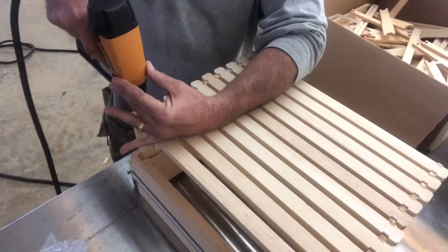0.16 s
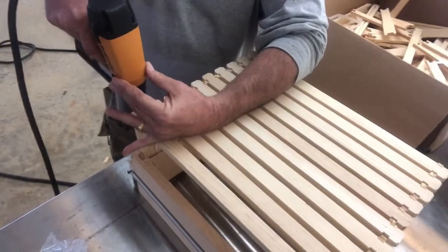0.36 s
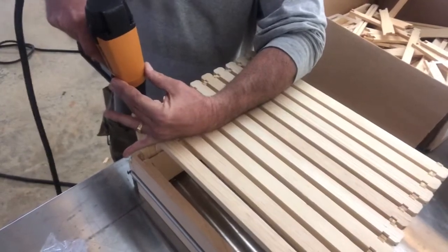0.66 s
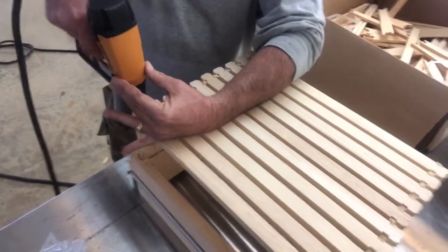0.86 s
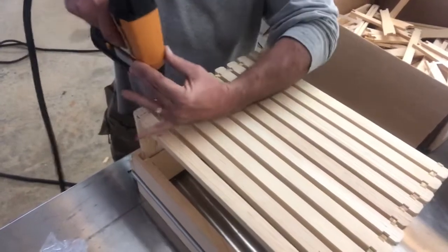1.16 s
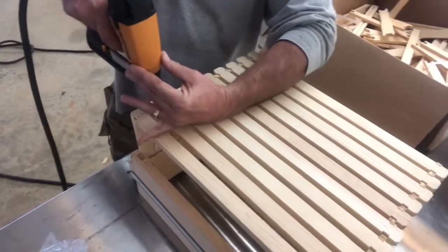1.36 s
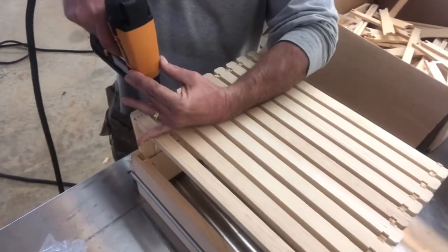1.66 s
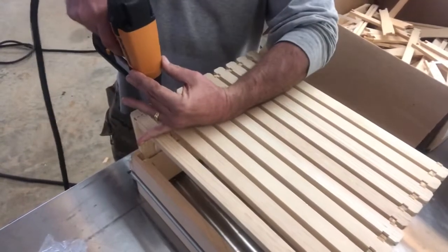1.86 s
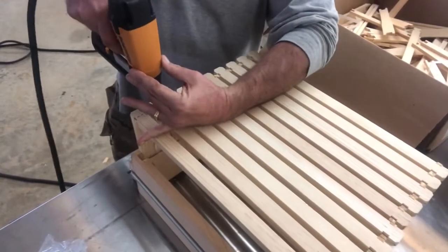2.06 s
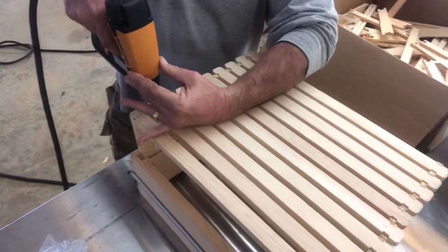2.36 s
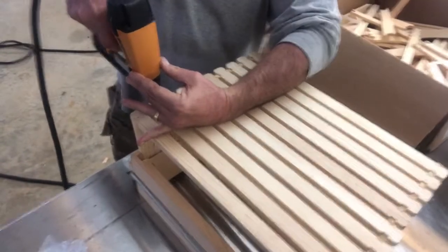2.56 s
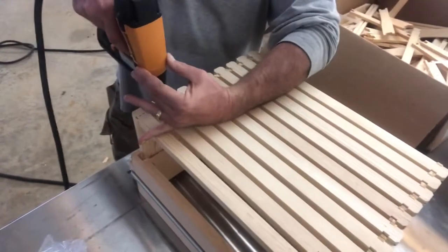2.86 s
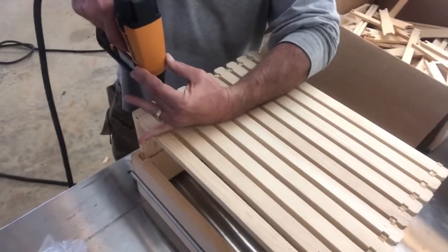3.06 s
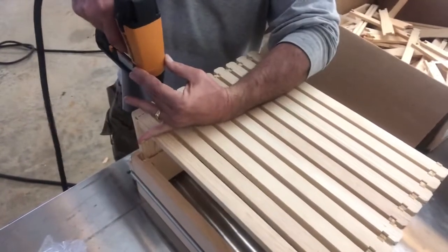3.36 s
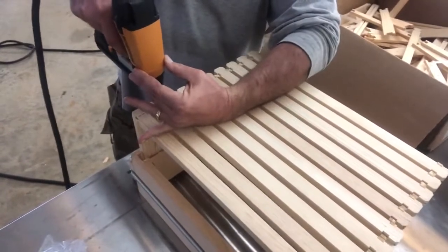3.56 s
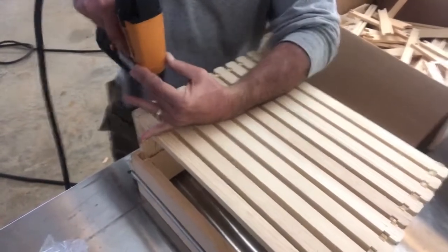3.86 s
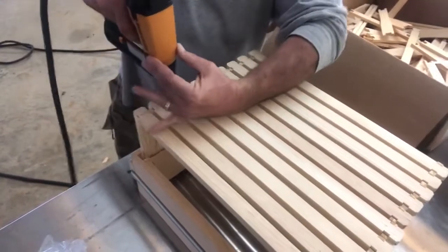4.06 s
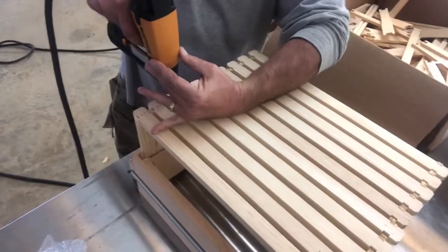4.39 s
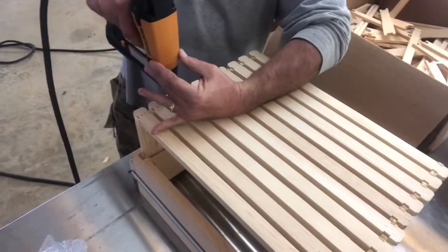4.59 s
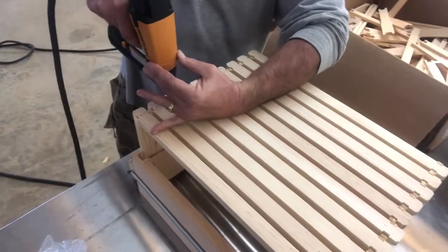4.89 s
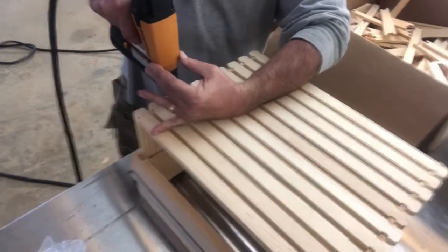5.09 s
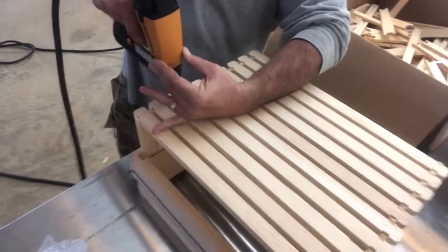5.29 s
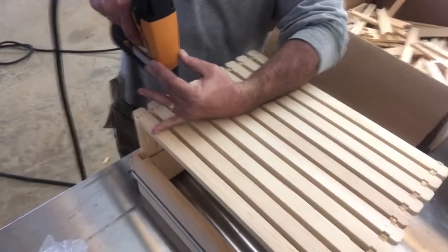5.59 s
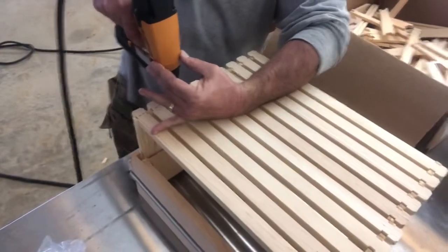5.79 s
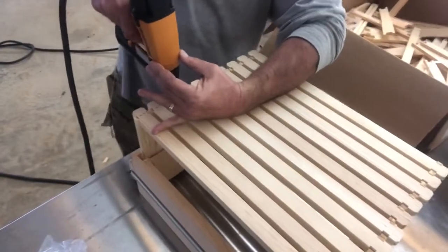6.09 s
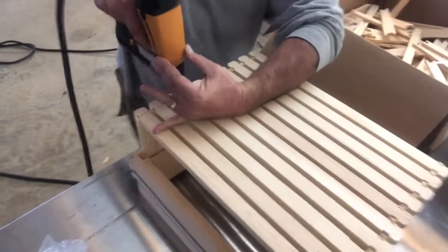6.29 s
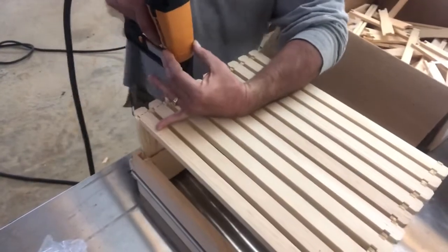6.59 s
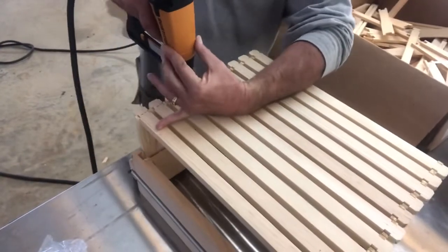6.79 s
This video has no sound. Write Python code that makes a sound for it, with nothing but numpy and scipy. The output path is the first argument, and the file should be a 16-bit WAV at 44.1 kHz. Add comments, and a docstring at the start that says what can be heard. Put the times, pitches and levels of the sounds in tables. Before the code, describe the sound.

A pneumatic stapler fires five sharp, cracking shots into wooden slats, each followed by a clack and air burst, echoing through a hard-walled workshop.

```python
"""Low room noise with a wavering hum, a light tool tick, then a pneumatic stapler drives five staples into a
frame of wooden slats in a large, hard-walled workshop. Each shot: ticks, blade snap, bumper hit, frame thump;
on letting go the valve clacks, air blows off, the piston knocks home. Between: handling, leak whistle, a far puff.
Blows: rough forces ringing resonances. Air: coloured noise shaped by flow. Echo: noise decaying band by band."""
import sys
import numpy as np
from scipy import signal
from scipy.fft import rfft, irfft
from scipy.io import wavfile

SR = 44100
rng = np.random.default_rng(int(sys.argv[2]) if len(sys.argv) > 2 else 0)


def to_wav(s):
    """Save 16-bit WAV."""
    ch = np.atleast_2d(s).T  # columns
    pcm = np.round(np.clip(ch, -1, 1) * 32767)  # PCM
    wavfile.write(sys.argv[1], SR, pcm.astype(np.int16))


N = 306054
TIME = np.arange(N) / SR
SHORT = TIME[:2 ** 14]   # time axis of a single blow

# background noise spectrum: f/Hz, level/dB per Hz
FLOOR_SPECTRUM = [(15, -48), (25, -23.5), (157, -2), (222, -2.5), (276, -7), (325, -3.5), (513, -7.5),
                  (955, -16.5), (1090, -16), (2030, -21.5), (2200, -20), (4500, -18.5), (5400, -29),
                  (8270, -39), (15800, -49)]
# background noise level: t/s, level/dB
FLOOR_LEVEL = [(0, -50.5), (2.4, -48), (3.0, -57.5), (3.6, -53.5), (5.9, -51), (6.94, -48)]
# whistles of a leaking seal: t/s, length/s, f/Hz, level/dB
LEAKS = [(0.195, 0.12, 5600, -72), (0.286, 0.37, 6080, -67), (2.04, 0.14, 5530, -65.5),
         (2.19, 0.24, 5750, -64.5), (3.2, 0.2, 6100, -69)]
# distant air puff, dulled by the way: f/Hz, level/dB per Hz
FAR_PUFF_SPECTRUM = [(100, -7.5), (400, 7), (1000, 10), (2000, 3), (4500, 6), (6000, -4), (9000, -18),
                     (16000, -23.5)]
# tool clicks as it is shifted: t/s, level/dB
SHIFT_TICKS = [(0.015, -70.5), (0.34, -70.5), (1.544, -67.5), (1.576, -63.5), (2.128, -73), (4.657, -73.5)]
# safety nose and trigger ahead of each shot: lead/s, level/dB re blade snap
LEAD_TICKS = [(0.0245, -32), (0.013, -27.5)]
# soft bumps of hand and tool on the frame: t/s, level/dB
BUMPS = [(0.042, -63.5), (0.303, -62), (1.207, -60), (2.27, -65.5), (4.656, -66), (5.684, -63)]
# shots: t/s, blade snap level/dB, recoil force and air charge/dB
SHOTS = [(0.7310, -30, 0), (2.4770, -26.5, -4), (3.6817, -31, -3.5), (4.9737, -33, -5), (6.0315, -35, 0.88)]
# trigger hold of each shot: length/s
TRIGGER_HELD_S = [0.1155, 0.106, 0.0945, 0.103, 0.111]
# resonances of tool ticks: f/Hz, width/Hz, level/dB
TICK_MODES = [(900, 180, 2.5), (2400, 560, -2.5), (3200, 130, 1), (4300, 930, 0.5), (5530, 1800, -4.5),
              (7300, 1100, -8), (10100, 3000, -25.5)]
# resonances of loose slats under the hand: f/Hz, width/Hz, level/dB
SLAT_MODES = [(150, 70, -2.5), (215, 60, -7), (306, 47, -0.5), (969, 220, -16)]
# resonances of the exhaust valve: f/Hz, width/Hz, level/dB
VALVE_MODES = [(800, 220, -26), (1800, 500, -14), (2410, 320, 5.5), (3500, 340, -14), (4460, 590, -2.5),
               (6460, 1800, -15.5)]
# resonances of the piston at its top stop: f/Hz, width/Hz, level/dB
PISTON_HOME_MODES = [(435, 280, -3.5), (700, 180, -17), (912, 92, -3), (1300, 310, 2.5), (2400, 1500, -8.5),
                     (2896, 500, 2), (4400, 800, -3), (6610, 6100, -13)]
# resonances of the blade: f/Hz, width/Hz, level/dB
BLADE_MODES = [(180, 89, -2.5), (736, 390, 5.5), (1354, 330, 4), (1670, 270, 0), (2455, 300, 4.5),
               (3270, 650, 3), (4220, 400, 7), (5230, 300, -0.5), (6100, 1600, -7), (11900, 6000, -26)]
# resonances of the piston on its bumper: f/Hz, width/Hz, level/dB
BUMPER_MODES = [(139.6, 150, -8.5), (420, 130, -6.5), (1280, 570, -5.5), (2300, 700, -20),
                (3740, 1400, -6.5), (4667, 360, 4.5), (5320, 770, -2.5), (7200, 3700, -13.5),
                (12500, 6000, -23.5)]
# resonances of the wooden frame on its jig: f/Hz, width/Hz, level/dB
FRAME_MODES = [(59.9, 38, -18), (112, 32, -10.5), (161, 21, 0.5), (178, 47, -9.5), (207.4, 33, -6),
               (245.8, 52, -13), (315, 20, -11), (399.7, 17, -8), (537, 34, -8.5), (760, 170, -16)]
# air jet of inrush and exhaust: f/Hz, level/dB per Hz
AIR_JET_SPECTRUM = [(60, -23), (110, 1.5), (200, -19.5), (700, -20.5), (1300, -3.5), (1800, -19),
                    (2500, -11), (3300, -2), (4400, 2.5), (5600, -2.5), (7500, -5), (9000, -12.5),
                    (12500, -15), (16000, -24)]
# workshop decay: f/Hz, t60/s
ROOM_T60 = [(60, 1.2), (160, 0.48), (320, 1.58), (800, 1.11), (2400, 1.407), (4400, 1.323), (7000, 0.8),
            (10000, 0.72), (15000, 0.56)]
# workshop echo colour: f/Hz, level/dB
ROOM_COLOUR = [(50, -1.5), (170, 0.5), (300, 6), (440, -0.5), (620, 1), (800, -3.5), (1300, -5), (1900, 5),
               (2450, 3), (3000, -1), (4500, -1), (5600, -2.5), (8000, 4.5), (14000, 5)]

LEAK_WAVER_RMS_HZ, LEAK_FLICKER_RMS_DB, LEAK_FADE_S = 99.5, 3.5, 0.03
FAINT_TICKS_PER_S, FAINT_TICK_DB = 2.5, -78
BUMPER_OVER_SNAP_DB = 2.7
FRAME_DB, VALVE_DB, EXHAUST_DB, KNOCK_DB = -31.5, -29.2, -27, -30.5   # at a force of 0 dB
ROOM_FEED_DB = -22     # blade and bumper into the room, at a force of 0 dB
ROOM_FOLLOWS = 0.79    # feed dB per force dB
BUMPER_DELAY_S = 0.0074
PISTON_RETURN_S = 0.039   # valve clack to knock at the top
CUTOFF_HZ = 15900


def from_db(db):
    """Decibels to gain."""
    return 10 ** (np.asarray(db) / 20)


def unit(x):
    """Scale to the energy of one second at rms 1."""
    return x / np.sqrt(np.sum(x ** 2) / SR + 1e-20)


def at_hz(points, hz):
    """Read a table on a log-frequency axis."""
    f, value = np.transpose(points)
    return np.interp(np.log(hz + 1), np.log(f), value)


def add(track, s, sound):
    """Mix a sound into a track at time s."""
    start = max(int(round(s * SR)), 0)
    track[start:start + len(sound)] += sound[:N - start]


def coloured(x, spectrum):
    """Filter a sound by a spectrum table."""
    hz = np.fft.rfftfreq(len(x), 1 / SR)
    return irfft(rfft(x) * from_db(at_hz(spectrum, hz)), len(x))


def noise(spectrum, size):
    """Steady coloured noise, rms 1."""
    x = coloured(rng.standard_normal(size), spectrum)
    return x / x.std()


def swell(rise, hold, fade):
    """Blow envelope: linear rise, exponential decay from time hold; all in s."""
    decay = np.exp(-np.clip((SHORT - hold) / fade, 0, 40))
    return np.minimum(SHORT / rise, 1) * decay


def chatter(envelope):
    """Rough contact force: random in detail, about equally strong at all frequencies."""
    force = rng.standard_normal(len(SHORT)) * envelope
    # alternate between a flat spectrum and the envelope
    for _ in range(4):
        spectrum = rfft(force)
        flat = irfft(spectrum / (np.abs(spectrum) + 1e-12))
        force = flat * np.sqrt(envelope)
    return force


def struck(modes, force):
    """A force rings parallel resonances of alternating sign."""
    out = 0
    for k, (hz, width_hz, db) in enumerate(modes):
        r = np.exp(-np.pi * width_hz / SR)
        poles = [1, -2 * r * np.cos(2 * np.pi * hz / SR), r * r]
        ringing = (1 - r * r) / 2 * signal.lfilter([1, 0, -1], poles, force)
        out = out + (-1) ** k * from_db(db) * ringing
    return unit(out)


def jet(spectrum, flow):
    """Turbulent air that follows the flow through a vent."""
    return unit(coloured(chatter(flow), spectrum) * flow ** (1 / 8))


def background():
    """Ventilation noise with a narrow-band wavering hum; a lower drone joins at the end."""
    air = from_db(np.interp(TIME, *np.transpose(FLOOR_LEVEL))) * noise(FLOOR_SPECTRUM, size=N)
    hum_spectrum = [(270, -60.5), (302, -5.5), (314, -3.5), (328, -12.5), (365, -65.0), (900, -120)]
    hum = from_db(-62) * noise(hum_spectrum, size=N)
    drone_hz = 146
    drone_gate = np.clip((TIME - 6.6) / 0.14, 0, 1)
    drone = from_db(-50) * drone_gate * np.sin(2 * np.pi * drone_hz * TIME)
    return air + hum + drone


def far_puff():
    """A faint puff of air from across the shop, for the room feed only."""
    out = np.zeros(N)
    puff = jet(FAR_PUFF_SPECTRUM, swell(rise=.002, hold=.01, fade=0.035))
    add(out, 1.733, from_db(-56.0) * puff)
    return out


def leak():
    """Thin sine whistle of a leaking seal, unsteady in pitch and strength."""
    out = np.zeros(N)
    waver_hz = LEAK_WAVER_RMS_HZ * noise([(10, -6), (200, -6), (2000, -45)], size=N)
    flicker_db = LEAK_FLICKER_RMS_DB * noise([(10, -2), (40, -2), (300, -60)], size=N)
    for s, length_s, pitch_hz, db in LEAKS:
        gate = np.clip(np.minimum(TIME - s, s + length_s - TIME) / LEAK_FADE_S, 0, 1)
        whistle = np.sin(2 * np.pi * np.cumsum(pitch_hz + waver_hz) / SR)
        out += from_db(db + flicker_db) * gate * whistle
    return out


def tick_times():
    """Tool ticks as (t/s, level/dB): two ahead of each shot, listed shifts, random faint ones."""
    leading = [(s - lead_s, snap_db + db) for s, snap_db, _ in SHOTS for lead_s, db in LEAD_TICKS]
    faint = [(s, FAINT_TICK_DB) for s in TIME[rng.random(N) < FAINT_TICKS_PER_S / SR]]
    return leading + SHIFT_TICKS + faint


def tool_tick():
    """A light contact rings the tool's small parts."""
    return struck(TICK_MODES, chatter(swell(rise=0.00044, hold=0.0027, fade=0.0043)))


def slat_bump():
    """A soft, slow contact rings loose slats."""
    return struck(SLAT_MODES, chatter(swell(rise=0.0037, hold=0.016, fade=0.016)))


def nose_squeak():
    """The nose shifts on the wood: a falling, jittering tone."""
    jitter_hz = 120 * noise([(50, -4.5), (300, 2.0), (2000, -52)], size=len(SHORT))
    falling_hz = 2900 + 1400 * np.exp(-SHORT / 0.016) + jitter_hz
    tone = np.sin(2 * np.pi * np.cumsum(falling_hz) / SR)
    return tone * swell(rise=0.0089, hold=0.03, fade=0.00514)


def handling():
    """Tool ticks, dull bumps on the slats and one short squeak."""
    out = np.zeros(N)
    for s, db in tick_times():
        add(out, s, from_db(db) * tool_tick())
    for s, db in BUMPS:
        add(out, s, from_db(db) * slat_bump())
    add(out, 3.513, from_db(-52.0) * nose_squeak())
    return out


def valve_clack():
    """The valve hits its seat; a rubber seal takes the edge off."""
    soft_seat = signal.butter(2, 7000, fs=SR, output="sos")
    force = chatter(swell(rise=0.00026, hold=0.0021, fade=.0005))
    return struck(VALVE_MODES, signal.sosfilt(soft_seat, force))


def blow_off():
    """Cylinder exhaust: a first spurt at full pressure over a steadier flow until the piston is home."""
    spurt = .5 * swell(rise=0.0032, hold=.014, fade=0.0023)
    steady = swell(rise=0.008, hold=PISTON_RETURN_S - .004, fade=0.0098)
    return jet(AIR_JET_SPECTRUM, steady + spurt)


def piston_knock():
    """The returning piston strikes its top stop."""
    return struck(PISTON_HOME_MODES, chatter(swell(rise=.002, hold=0.0066, fade=0.0075)))


def releases():
    """Valve clack, blow-off and piston knock on letting go; returns direct sound and room feed."""
    direct, feed = np.zeros(N), np.zeros(N)
    for (fired_s, _, force_db), held_s in zip(SHOTS, TRIGGER_HELD_S):
        s = fired_s + held_s
        # delay/s, sound, level/dB, room share/dB
        parts = [(0, valve_clack(), VALVE_DB, -7.5),
                 (.005, blow_off(), EXHAUST_DB, -1.8),
                 (PISTON_RETURN_S, piston_knock(), KNOCK_DB, -2.7)]
        for delay_s, sound, db, share_db in parts:
            add(direct, s + delay_s, from_db(force_db + db) * sound)
            add(feed, s + delay_s, from_db(force_db + db + share_db) * sound)
    return direct, feed


def inrush():
    """Air rushes in above the piston, ever faster."""
    return jet(AIR_JET_SPECTRUM, swell(rise=.006, hold=.006, fade=.001) ** 3)


def blade_snap():
    """The blade shears the staple off with a crack, then pushes it through the wood."""
    crack = swell(rise=.0001, hold=0.00074, fade=0.00036)
    push = swell(rise=0.00029, hold=0.0032, fade=0.0031)
    return struck(BLADE_MODES, chatter(crack + push))


def bumper_hit():
    """The piston lands on its bumper."""
    return struck(BUMPER_MODES, chatter(swell(rise=0.0026, hold=.0036, fade=0.0048)))


def frame_thump():
    """The recoil shakes the wooden frame."""
    return struck(FRAME_MODES, chatter(swell(rise=.005, hold=.022, fade=.008)))


def shots():
    """Inrush, blade on staple, piston on bumper, frame thump; returns direct sound and room feed."""
    direct, feed = np.zeros(N), np.zeros(N)
    for s, blade_db, force_db in SHOTS:
        frame_db = FRAME_DB + force_db
        room_db = ROOM_FEED_DB + ROOM_FOLLOWS * force_db
        add(direct, s - .006, from_db(-53) * inrush())
        # delay/s, sound, level/dB, room share/dB
        parts = [(0, blade_snap(), blade_db, -2.8),
                 (BUMPER_DELAY_S, bumper_hit(), blade_db + BUMPER_OVER_SNAP_DB, -3.5)]
        for delay_s, sound, db, share_db in parts:
            add(direct, s + delay_s, from_db(db) * sound)
            add(feed, s + delay_s, from_db(room_db + share_db) * sound)
        frame = frame_thump()
        add(direct, s + .022, from_db(frame_db) * frame)
        add(feed, s + 0.0065, from_db(frame_db - 10.0) * frame)
    return direct, feed


def room_response():
    """Near surfaces answer at once, walls and ceiling after some 30 ms; the tail dies band by band."""
    t = TIME[:2 ** 16]
    hz = np.fft.rfftfreq(len(t), 1 / SR)
    separate_db = 5.8 * np.exp(-t / .2)   # early echoes come singly, late ones merge
    echo_gain = from_db(separate_db * rng.standard_normal(len(t)))
    echoes = rfft(rng.standard_normal(len(t)) * echo_gain)
    echoes = echoes * from_db(at_hz(ROOM_COLOUR, hz))
    centres_hz = np.geomspace(50, 16000, 12)
    tail = 0
    # each row of the identity picks one band, overlapping its neighbours
    for centre_hz, pick in zip(centres_hz, np.eye(len(centres_hz))):
        band = irfft(echoes * at_hz(np.c_[centres_hz, pick], hz))
        tail = tail + band * from_db(-60 * t / at_hz(ROOM_T60, centre_hz))
    walls = np.clip((t - .023) / 0.018, 0, 1)
    near = np.clip(t / .002, 0, 1)
    wall_burst = 0.51 * walls * np.exp(-np.abs(t - .032) / 0.018)
    build_up = near * (0.67 + 0.35 * walls) + wall_burst
    return unit(tail * build_up) / np.sqrt(SR)


def workshop(x):
    """Worker and tool shift between shots, so each shot meets its own pattern of echoes."""
    out = np.zeros(N)
    edges = [0] + [int((shot[0] - .1) * SR) for shot in SHOTS[1:]] + [N]
    for start, end in zip(edges, edges[1:]):
        add(out, start / SR, signal.fftconvolve(x[start:end], room_response()))
    return out


def scene():
    """The stapler close by, its echo and the shop's background."""
    shot, shot_feed = shots()
    release, release_feed = releases()
    small = handling()
    feed = shot_feed + release_feed + from_db(-5.5) * small + far_puff()
    echo = from_db(-0.5) * workshop(feed)
    return (shot + release + small + echo + leak() + background())[None]


def record(dry):
    """The loudest peaks overload the recorder; a steep low-pass cuts the top."""
    clipped = dry / (1 + dry ** 8) ** (1 / 8)
    low_pass = signal.ellip(10, .1, 70, CUTOFF_HZ, fs=SR, output="sos")
    return signal.sosfilt(low_pass, clipped)


dry = scene()
out = record(dry)
to_wav(out)
```